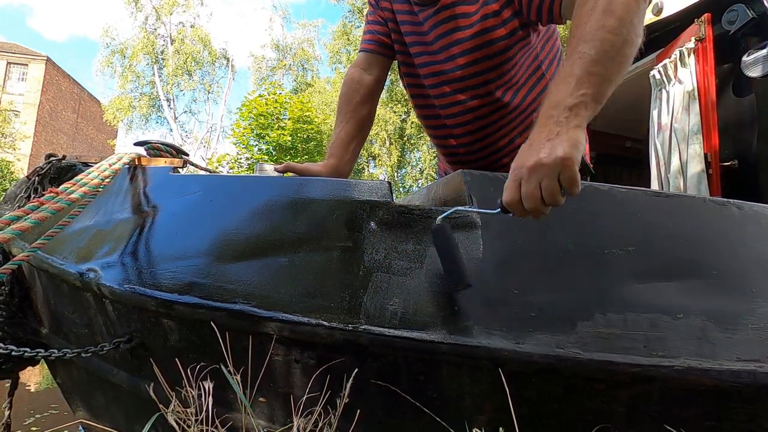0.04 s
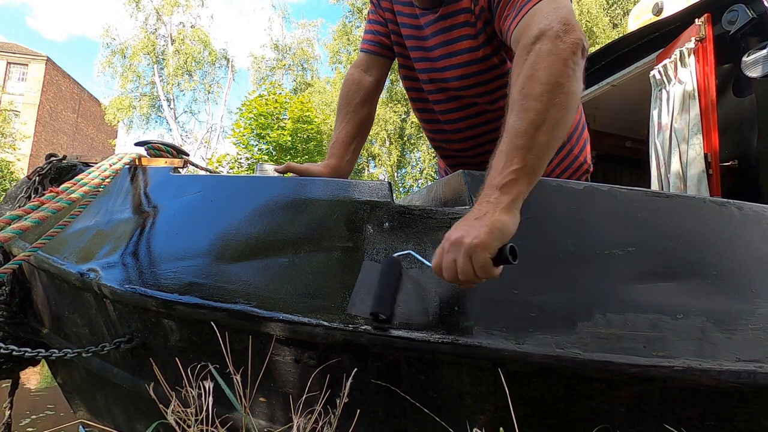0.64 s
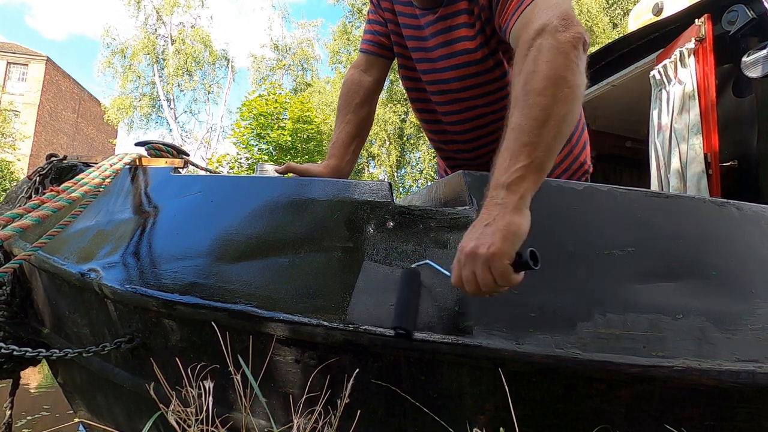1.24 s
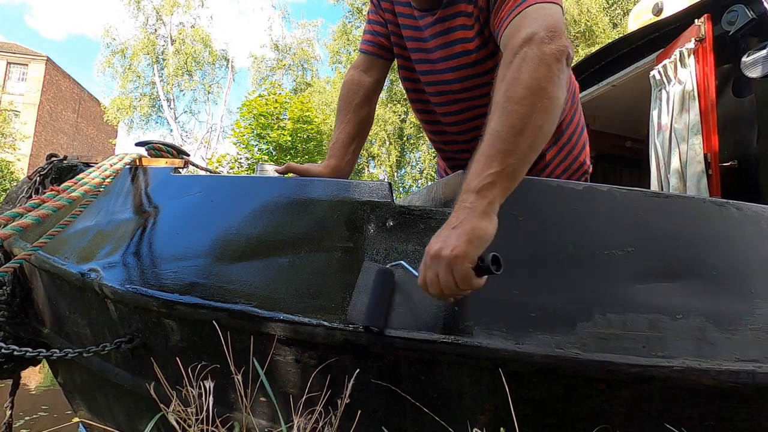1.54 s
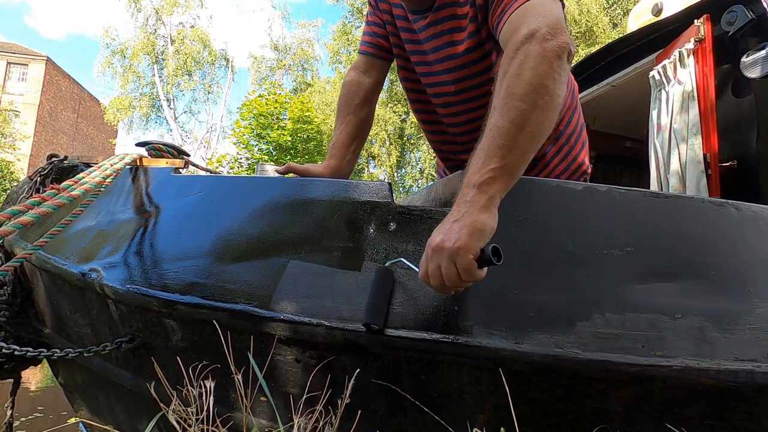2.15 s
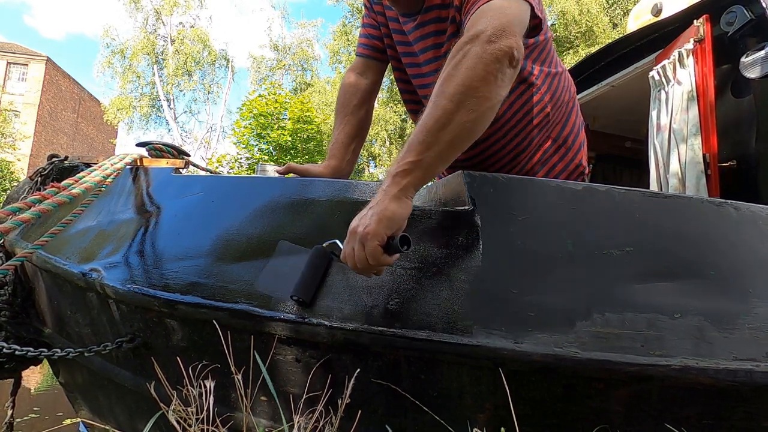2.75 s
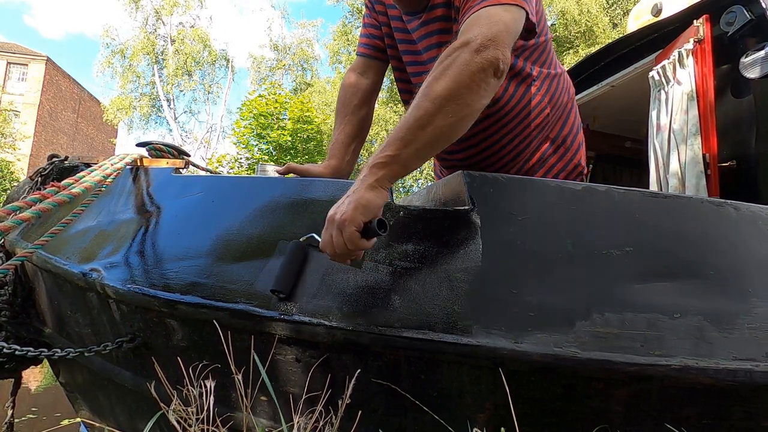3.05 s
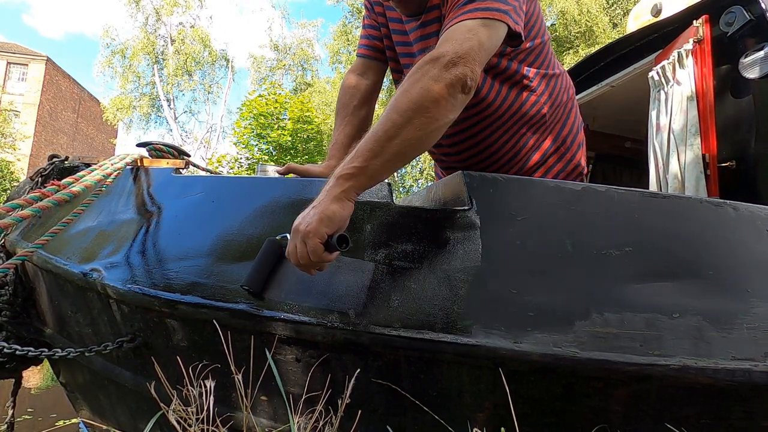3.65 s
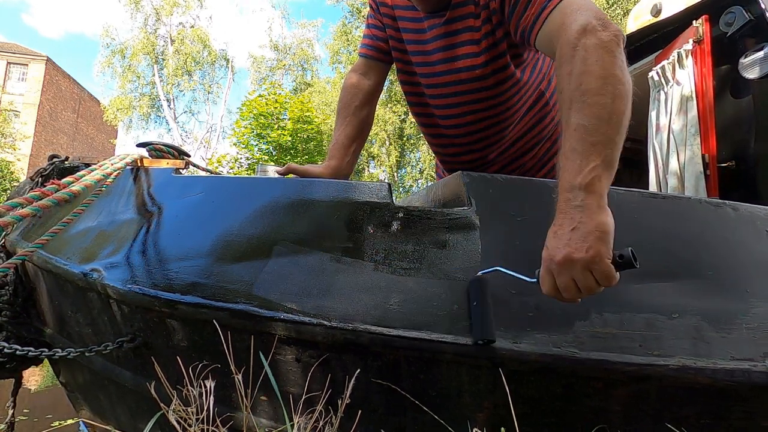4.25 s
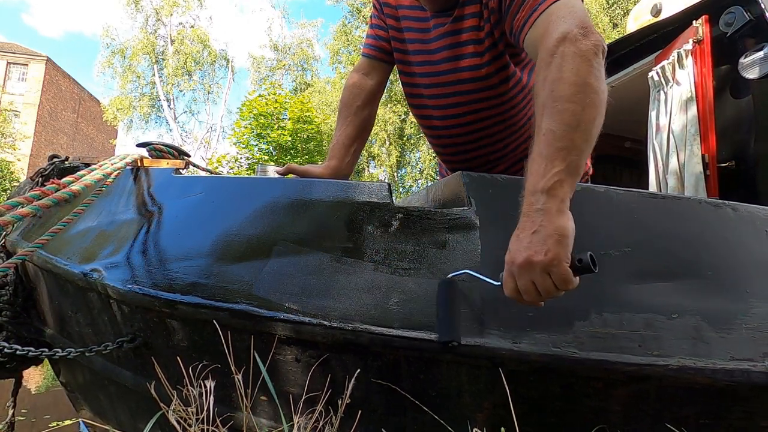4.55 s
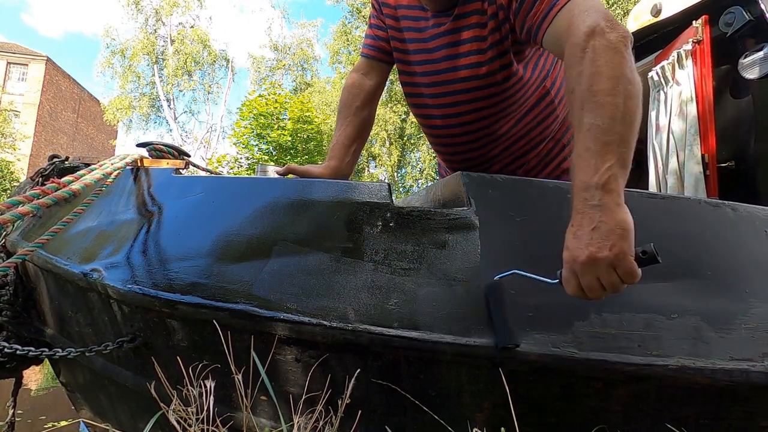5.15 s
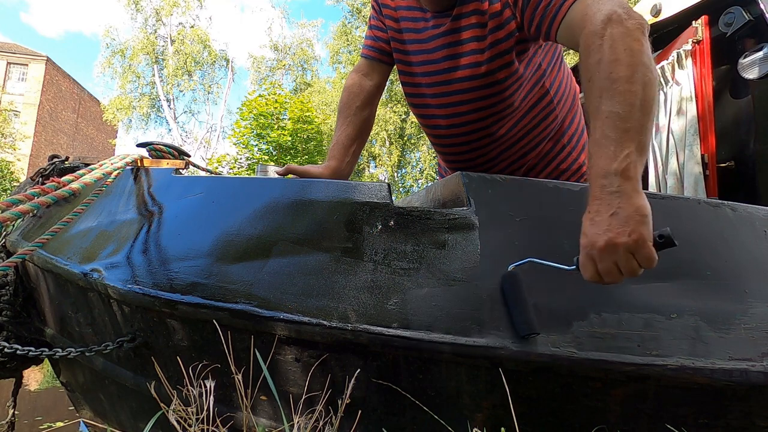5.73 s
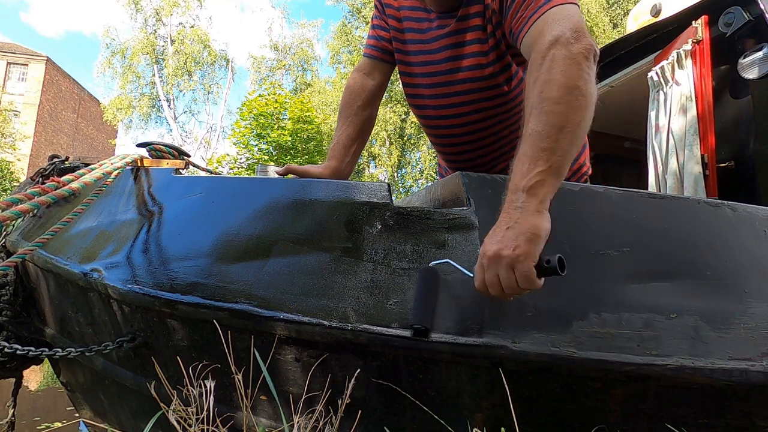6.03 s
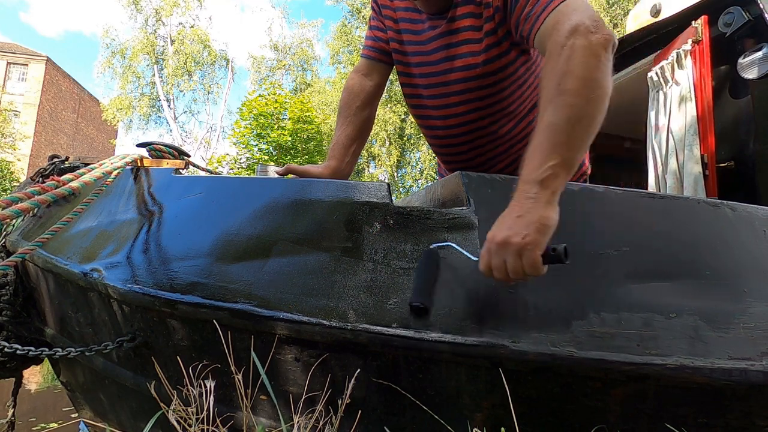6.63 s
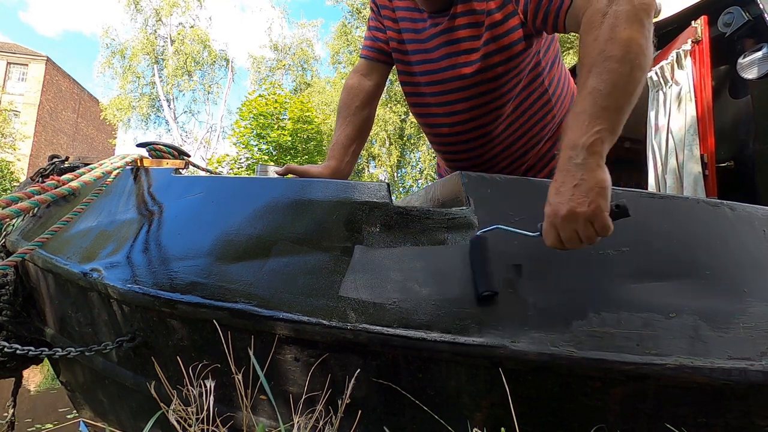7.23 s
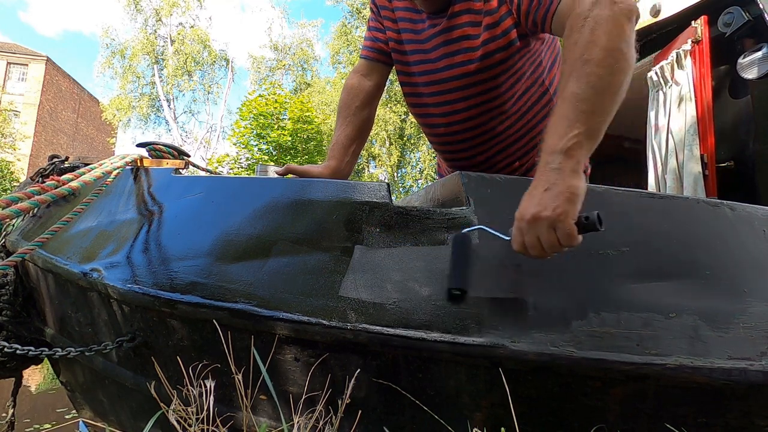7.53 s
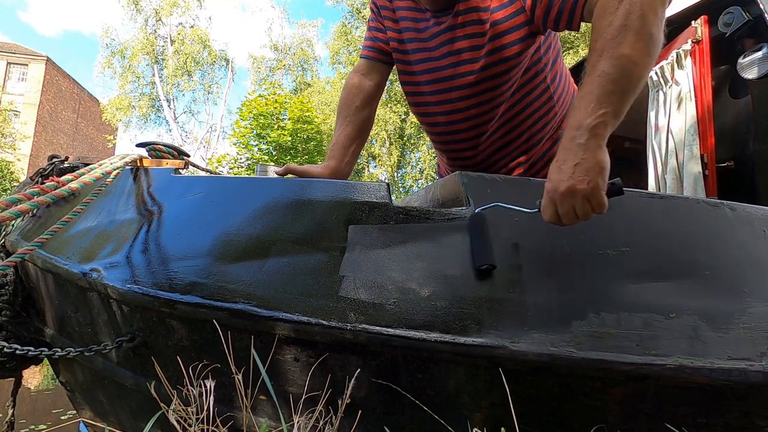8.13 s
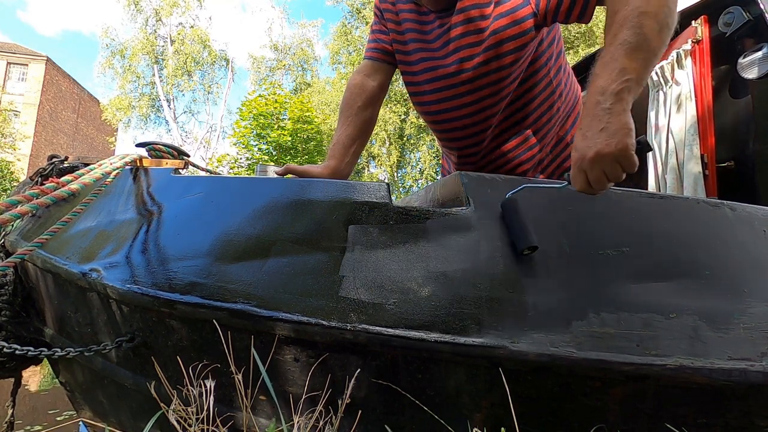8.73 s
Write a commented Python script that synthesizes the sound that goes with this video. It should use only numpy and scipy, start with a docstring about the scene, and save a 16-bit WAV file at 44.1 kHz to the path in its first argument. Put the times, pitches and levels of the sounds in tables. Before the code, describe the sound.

Close by, a small paint roller clicks a few times, then makes soft, tacky rasping strokes to and fro on a steel boat hull, bumping it lightly once past the middle. A much louder, deep diesel drone and exhaust rumble fill the outdoor background throughout. The engine gradually rises in pitch and starts to throb as it draws nearer, while road noise builds behind it.

```python
"""A small paint roller rasps to and fro on a steel boat hull, outdoors, under a heavy diesel's deep drone.
Tacky paint tears off the nap in tiny snaps; the sleeve clicks on its frame and bumps the hull once.
The diesel slowly gathers speed and comes closer; its drone swells and fades as reflections off buildings
cross the direct sound. Behind it: exhaust rumble, a growing rush of road noise, faint squeals."""
import sys
import numpy as np
from scipy import signal
from scipy.fft import rfft, irfft, next_fast_len
from scipy.io import wavfile

SR = 44100
rng = np.random.default_rng(int(sys.argv[2]) if len(sys.argv) > 2 else 0)


def master(y):
    """Save y as 16-bit WAV."""
    cut = np.clip(np.atleast_2d(y).T, -1, 1)
    pcm = np.round(cut * 32767)  # scale
    wavfile.write(sys.argv[1], SR, pcm.astype(np.int16))


N = 391608
TIME = np.arange(N) / SR

# roller sweeps: start_s, length_s, level_db, fastest_fraction, roundness (low: even push, high: one swell)
ROLLER_STROKES = [(0.432, 0.086, -58.5, 0.51, 2.0), (0.49, 0.2, -57.5, 0.61, 1.5),
                  (0.696, 0.26, -58.0, 0.25, 0.64), (0.966, 0.249, -58.0, 0.72, 0.4),
                  (1.243, 0.26, -58.5, 0.18, 0.5), (1.503, 0.472, -55.0, 0.74, 0.5),
                  (1.991, 0.39, -59.0, 0.38, 1.3), (2.352, 0.343, -51.5, 0.37, 0.9),
                  (2.699, 0.23, -59.5, 0.44, 0.6), (2.922, 0.22, -52.0, 0.41, 1.7),
                  (3.118, 0.32, -58, 0.39, 1.4), (3.438, 0.37, -57.0, 0.26, 0.7),
                  (3.788, 0.56, -57.0, 0.6, 1.0), (4.371, 0.24, -64.0, 0.63, 0.5),
                  (4.609, 0.22, -59.5, 0.29, 1.4), (4.785, 0.26, -58.0, 0.67, 1.4),
                  (5.016, 0.33, -58.5, 0.22, 1.7), (5.295, 0.3, -63, 0.73, 1.0),
                  (5.591, 0.353, -60.0, 0.23, 1.5), (5.91, 0.355, -63.0, 0.64, 1.1),
                  (6.252, 0.34, -61.5, 0.25, 1.2), (6.698, 0.3, -58.5, 0.65, 0.5),
                  (6.995, 0.47, -57, 0.55, 1.1), (7.595, 0.33, -55.0, 0.76, 1.4),
                  (7.915, 0.42, -55.0, 0.57, 1.0), (8.315, 0.24, -64.5, 0.85, 0.4),
                  (8.566, 0.23, -56, 0.8, 1.0)]
# tacky patches, where paint tears harder: time_s, extra_db
TACKY_PATCHES = [(.6, 4), (.79, 3), (1.155, 2.5), (1.715, 4), (1.843, 3), (2.16, 4), (2.525, 2),
                 (4.11, 2.5), (4.225, 3.5), (4.685, 2), (5.13, 4), (5.51, 5), (5.72, 2.5), (6.905, 3),
                 (7.275, 4), (7.355, 2), (7.835, 3), (8.185, 1.5)]
# tearing paint: freq_hz, density_db
RASP_SPECTRUM = [(500, -16.5), (1000, -0.5), (2000, -6), (3000, -0.5), (4200, -2.5), (6000, -0.5),
                 (7500, -6.5), (9300, -2.5), (11000, -14.5), (13000, -17), (15500, -23)]
# rasp stereo width: freq_hz, correlation
RASP_CORRELATION = [(500, .9), (2000, .78), (4000, 0.55), (7000, .6), (9000, .66), (12000, .48),
                    (15000, .35)]
# rasp side: freq_hz, left_minus_right_db
RASP_PAN = [(500, -5), (2500, 1), (5000, 0), (9000, -2), (14000, -4.5)]
# reflection peaks and dips in the rasp: freq_hz, width_hz, gain_db
RASP_REFLECTIONS = [(2760, 1200, 1.5), (3260, 200, -4.5), (3780, 620, 4), (6140, 420, 0.5), (7100, 900, -4),
                    (9400, 780, 3), (10950, 1100, -3.5)]
# sleeve knocks on the frame: time_s, level_db, brightness_hz
FRAME_KNOCKS = [(0.0122, -29.5, 9000), (.0252, -42, 2500), (0.1835, -25, 6000), (0.1898, -30, 1500),
                (0.1955, -40, 9000), (0.262, -37.5, 9000), (2.715, -37, 2010), (7.477, -27.5, 1289)]
# frame and handle modes: freq_hz, level_db, t60_s
FRAME_MODES = [(983, -9, 0.028), (1270, -9, 0.019), (1480, -7, .014), (1940, -1.5, 0.01), (2180, -7, 0.013),
               (2470, -2.5, 0.011), (3628, -6.5, 0.013), (4470, -13.5, 0.011), (5400, -15.5, .006)]
# soft bumps on the hull: time_s, level_db
HULL_KNOCKS = [(6.017, -37.5)]
# steel plate modes: freq_hz, level_db, t60_s
HULL_MODES = [(755, 1, .06), (850, -7, .04), (970, -5, .05)]

# diesel speed: time_s, firing_hz
FIRING_RATE = [(0, 51.7), (1.0, 53.4), (2.0, 56.6), (2.7, 59.3), (3.6, 60.7), (4.5, 62), (5.1, 62.8),
               (5.8, 63.1), (6.3, 65), (6.7, 65.6), (7.1, 65), (7.55, 63.3), (7.95, 64.6), (8.25, 64.3),
               (8.6, 64.3), (8.88, 63)]
# engine orders 1-4, multiples of the firing rate: time_s, level_db
ORDER_1_LEVEL = [(0.02, -22), (0.51, -17), (1.99, -21), (2.06, -27), (2.13, -43), (2.18, -24.5),
                 (2.33, -18), (2.7, -21), (3.19, -16), (4.15, -22), (4.5, -34), (4.54, -25.5), (4.99, -16),
                 (6.0, -16), (7.15, -21), (7.4, -28), (7.52, -22), (8.21, -19), (8.36, -27), (8.85, -21)]
ORDER_2_LEVEL = [(0.02, -37), (0.24, -28.5), (1.15, -42), (1.35, -32), (2.28, -27), (2.87, -38),
                 (3.61, -28), (3.73, -37.5), (3.98, -25), (4.27, -32.5), (4.42, -24.5), (4.99, -39),
                 (5.23, -27.5), (5.97, -32), (6.07, -40), (6.73, -30), (8.7, -39), (8.85, -31)]
ORDER_3_LEVEL = [(0, -46.5), (2.9, -49), (3.8, -41.5), (4.3, -47), (5.2, -38), (5.9, -51), (7.0, -38.5),
                 (7.9, -48), (8.6, -38)]
ORDER_4_LEVEL = [(0, -70), (2.4, -55.5), (3.9, -46.5), (4.6, -38.5), (5.2, -36.3), (5.6, -40.5),
                 (6.6, -40.5), (7.7, -47), (8.0, -40), (8.88, -41.5)]
# weak lines from unequal cylinders: order, level_re_rumble_db
UNEVEN_ORDERS = [(.5, -7), (1.5, -20), (2.5, -9.5), (3.5, -16.5), (5, -22.5)]

# exhaust rumble, deep buffeting, road rush, tyre roar: time_s, level_db
RUMBLE_LEVEL = [(0, -38.5), (0.7, -38.3), (1.1, -41.5), (2.2, -37.5), (3.5, -41), (4.4, -38), (4.85, -33.5),
                (5.6, -42), (6.4, -36.8), (7.1, -38.5), (8.65, -33.5)]
BUFFET_LEVEL = [(0, -34), (0.7, -37.5), (1.2, -47), (2.7, -35), (3.5, -43), (4.4, -37), (5.6, -46),
                (6.4, -43), (7.1, -32), (8.0, -32), (8.88, -37)]
RUSH_LEVEL = [(0, -51), (0.8, -54), (1.7, -53), (2.6, -51), (3.5, -52.5), (4.4, -49.5), (4.85, -46.5),
              (5.5, -49), (6.4, -47), (7.45, -45), (7.9, -46.3), (8.88, -44)]
TYRE_LEVEL = [(0, -78.5), (3.8, -69), (4.6, -57.5), (6, -55.5), (7.5, -53), (8.1, -56.5), (8.88, -64)]
# their spectra: freq_hz, density_db
RUMBLE_SPECTRUM = [(45, -5.5), (80, 2.5), (115, 0), (160, 0.5), (220, -4.5), (300, -11), (400, -18.5),
                   (550, -32), (800, -42)]
BUFFET_SPECTRUM = [(15, -7.5), (25, -10), (38, -0.5), (55, -5.5), (80, -7)]
RUSH_SPECTRUM = [(200, 5), (350, 4.5), (520, 5), (720, 0), (1000, -1), (1350, -3.5), (1750, -3), (2400, -7),
                 (3400, -9.5), (4800, -16), (6800, -25.5), (9500, -50.5), (15000, -50)]
TYRE_SPECTRUM = [(550, -12), (700, -4), (850, -0.5), (1000, -7), (1200, -14.5)]
# road noise stereo width: freq_hz, correlation (capped at 1)
ROAD_CORRELATION = [(60, 1.5), (280, 1.1), (500, 0.93), (1000, 0.72), (2000, 0.44), (4000, 0.28), (8000, 0)]
# road noise side: freq_hz, left_minus_right_db
ROAD_PAN = [(60, 1.2), (250, 2), (600, 2.5), (2000, 4.3), (8000, 1.4)]
# reflection peaks and dips in rumble and rush: freq_hz, width_hz, gain_db
ROAD_REFLECTIONS = [(410, 60, 0.5), (505, 33, 3), (649, 50, -5), (672, 51, 4), (824, 82, -5),
                    (1540, 100, 1.5), (1780, 130, 1.5), (2200, 600, -1.8), (3290, 260, 4.5)]
# distant squeals: start_s, end_s, pitch_hz, level_db
SQUEAL_TONES = [(.3, 0.552, 3040, -66.5), (.73, 0.921, 4560, -63), (.97, 1.1, 3820, -63),
                (1.304, 1.604, 3030, -66), (1.824, 2.124, 3025, -63), (3.601, 4.2, 708, -74),
                (3.68, 4.202, 759, -59.5)]


def roller(snaps_per_s=11000, size_spread_db=5.0, nap_db=1.38, nap_hz=50, hiss=0.38, rasp_db=4.5,
           turns_per_s=9.0, lopsided_db=1, patch_sigma_s=0.013):
    """Paint threads snap as the nap lifts off the steel; an unevenly loaded sleeve pulses once a turn."""
    speed, gain = sweeps()
    tearing = np.sqrt(gain / gain.max()) + 0.00077  # faster rolling tears more threads
    snapped = rng.random((2, 2, N)) < snaps_per_s * tearing / SR
    sizes = from_db(size_spread_db * np.minimum(rng.exponential(1, snapped.shape), 4))
    signs = rng.choice([-1, 1], snapped.shape)
    snaps = unit_rms(snapped * sizes * signs / np.sqrt(tearing)) + hiss * white()
    turn_db = lopsided_db * np.sin(2 * np.pi * turns_per_s * np.cumsum(speed) / SR)
    tacky_db = sum(db * np.exp(-.5 * ((TIME - time_s) / patch_sigma_s) ** 2) for time_s, db in TACKY_PATCHES)
    level_db = rasp_db + turn_db + tacky_db + nap_db * drift(nap_hz)
    return gain * from_db(level_db) * coloured(snaps, RASP_SPECTRUM, RASP_CORRELATION, RASP_PAN)


def sweeps():
    """Each stroke speeds up from rest and slows to the turn. Returns speed (0-1) and rasp gain."""
    speed, gain = np.zeros(N), np.zeros(N)
    for start_s, length_s, level_db, fastest, roundness in ROLLER_STROKES:
        travel = np.interp(TIME, start_s + length_s * np.array([0, fastest, 1]), [0, .5, 1])
        arch = np.sin(np.pi * np.minimum(travel, 1 - travel))
        speed = np.maximum(speed, arch)
        gain = np.hypot(gain, from_db(level_db) * arch ** roundness)
    return speed, gain


def frame_clicks(vary_db=2.0):
    """The sleeve knocks on its wire frame; a soft knock stirs only the low modes."""
    times_s, level_db, bright_hz = np.transpose(FRAME_KNOCKS)
    scatter_db = vary_db * rng.standard_normal((len(FRAME_KNOCKS), len(FRAME_MODES)))
    strengths = from_db(level_db[:, None] + scatter_db)
    out = 0
    for k, (hz, mode_db, t60_s) in enumerate(FRAME_MODES):
        knocks = np.zeros(N)
        knocks[np.round(times_s * SR).astype(int)] = strengths[:, k] / np.hypot(1, (hz / bright_hz) ** 3)
        out += (-1) ** k * from_db(mode_db) * ring(knocks, hz, t60_s)
    return out * pan(left_db=-2.0)


def hull_bump():
    """A soft bump rings the steel plate briefly."""
    knocks = np.zeros(N)
    for time_s, level_db in HULL_KNOCKS:
        knocks[round(time_s * SR)] = from_db(level_db)
    plate = sum(from_db(mode_db) * ring(knocks, hz, t60_s) for hz, mode_db, t60_s in HULL_MODES)
    return plate * pan(left_db=1.0)


def diesel_drone(rumble_db, flutter_db=0.56, jitter_rad=0.0083):
    """Orders 1-3 and weak uneven lines; firings vary in strength and timing, shaking high orders most."""
    phase = 2 * np.pi * np.cumsum(curve(FIRING_RATE)) / SR + jitter_rad * drift(12)
    orders_db = curve(ORDER_1_LEVEL), curve(ORDER_2_LEVEL) - 0.5, curve(ORDER_3_LEVEL)
    out = 0
    for order, level_db in enumerate(orders_db, 1):
        gain = from_db(level_db + order * flutter_db * drift(25))
        out += gain * np.sin(order * phase + rng.uniform(0, 2 * np.pi))
    for order, level_db in UNEVEN_ORDERS:
        gain = from_db(rumble_db + level_db + 3 * drift(2))
        out += gain * np.sin(order * phase + drift(1.5))
    return np.sqrt(2) * out * pan(left_db=1.4)


def diesel_hum(throb_hz=7.8, throb_depth=0.7, throb_start_s=4.16, throb_rise_s=3.2, crest_s=8.37,
               flutter_db=1.5, waver_rad=0.52):
    """Upper hum at order 4; it begins to throb as the engine comes near."""
    depth = throb_depth * np.clip((TIME - throb_start_s) / throb_rise_s, 0, 1)
    throb = 1 + depth * np.cos(2 * np.pi * throb_hz * (TIME - crest_s))
    phase = 2 * np.pi * np.cumsum(4 * curve(FIRING_RATE)) / SR
    tone = np.sqrt(2) * np.sin(phase + waver_rad * drift(8))
    gain = from_db(curve(ORDER_4_LEVEL) + flutter_db * drift(13))
    return gain * throb * tone * pan(left_db=1.5)


def traffic(rumble_db, rush_trim_db=0.45, flicker_db=0.96):
    """Deep buffeting, turbulent exhaust, smooth road rush and the roar of tread."""
    def noise(spectrum):
        return coloured(white(), spectrum, ROAD_CORRELATION, ROAD_PAN)

    buffet = from_db(curve(BUFFET_LEVEL)) * noise(BUFFET_SPECTRUM)
    rumble = from_db(rumble_db) * noise(RUMBLE_SPECTRUM)
    rush = from_db(curve(RUSH_LEVEL) + rush_trim_db + flicker_db * drift(8)) * noise(RUSH_SPECTRUM)
    tyres = from_db(curve(TYRE_LEVEL)) * noise(TYRE_SPECTRUM)
    return buffet + reflections(rumble + rush, ROAD_REFLECTIONS) + tyres


def squeals(waver_fraction=0.0012):
    """Thin distant tones swell and die away."""
    out = 0
    for start_s, end_s, pitch_hz, level_db in SQUEAL_TONES:
        swell = np.sin(np.pi * np.clip((TIME - start_s) / (end_s - start_s), 0, 1))
        wavering_hz = pitch_hz * (1 + waver_fraction * drift(17))
        out += from_db(level_db) * swell * np.sin(2 * np.pi * np.cumsum(wavering_hz) / SR)
    return np.sqrt(2) * out * pan(left_db=1.0)


def reflections(x, peaks):
    """Peaks and dips left by reflections, as a chain of peaking filters."""
    for hz, width_hz, gain_db in peaks:
        w, gain = 2 * np.pi * hz / SR, from_db(gain_db / 2)
        damping = np.pi * width_hz / SR
        x = signal.lfilter([1 + damping * gain, -2 * np.cos(w), 1 - damping * gain],
                           [1 + damping / gain, -2 * np.cos(w), 1 - damping / gain], x)
    return x


def arriving(pair, right_lead_ms):
    """Sound from the right reaches the right channel first."""
    size = next_fast_len(N + 64)
    freq_khz = np.fft.rfftfreq(size, 1000 / SR)
    shift = np.exp(1j * np.pi * freq_khz * right_lead_ms * np.array([[-1], [1]]))
    return irfft(rfft(pair, size) * shift, size)[:, :N]


def coloured(pairs, spectrum, correlation, balance):
    """Third-octave bands from alternating mid-side pairs, each with its level, width and pan. Mid rms 1."""
    out, edges_hz = 0, 14 * 2 ** (np.arange(32) / 3)
    for k, (low_hz, high_hz) in enumerate(zip(edges_hz, edges_hz[1:])):
        if high_hz < spectrum[0][0] or low_hz > spectrum[-1][0]:
            continue
        bandpass = signal.butter(2, [low_hz, high_hz], "band", fs=SR, output="sos")
        mid, side = signal.sosfilt(bandpass, pairs[k % 2])
        hz = np.sqrt(low_hz * high_hz)
        alike = np.clip(at_hz(correlation, hz), -.9, 1)
        band = mid + np.sqrt((1 - alike) / (1 + alike)) * side * [[1], [-1]]
        out += from_db(at_hz(spectrum, hz)) * pan(at_hz(balance, hz)) * band
    return out / np.std(out.mean(axis=0))


def ring(knocks, hz, t60_s):
    """One mode: a unit knock starts a decaying sine of height 1."""
    r, w = from_db(-60 / (t60_s * SR)), 2 * np.pi * hz / SR
    return signal.lfilter([0, np.sin(w)], [1, -2 * r * np.cos(w), r * r], knocks + 1e-18)


def drift(rate_hz):
    """Smooth random wander, rms 1."""
    hop, settle_steps = 40, 2000
    r = np.exp(-2 * np.pi * rate_hz * hop / SR)
    noise = rng.standard_normal(N // hop + settle_steps + 2)
    slow = signal.lfilter([1], [1, -2 * r, r * r], noise)[settle_steps:]
    return np.interp(np.arange(N) / hop, np.arange(len(slow)), unit_rms(slow))


def white():
    """Two independent mid-side noise pairs."""
    return rng.standard_normal((2, 2, N))


def curve(points):
    """A time table at every sample."""
    return np.interp(TIME, *np.transpose(points))


def at_hz(points, hz):
    """Interpolate on a log-frequency axis."""
    freq_hz, values = np.transpose(points)
    return np.interp(np.log(hz), np.log(freq_hz), values)


def pan(left_db):
    """Stereo gains for a left-minus-right level."""
    return from_db(np.array([[.5], [-.5]]) * left_db)


def from_db(db):
    return 10 ** (np.asarray(db) / 20)


def unit_rms(x):
    return x / np.sqrt(np.mean(x ** 2) + 1e-20)


def scene():
    """Roller close by, slightly right; diesel and road behind."""
    rumble_db = curve(RUMBLE_LEVEL)
    road = diesel_drone(rumble_db) + diesel_hum() + traffic(rumble_db) + squeals()
    painting = reflections(roller(), RASP_REFLECTIONS) + frame_clicks() + hull_bump()
    return arriving(painting, right_lead_ms=0.026) + arriving(road, right_lead_ms=0.053)


def record(dry):
    """Short fade at both ends, steep low-pass."""
    fade_s, cutoff_hz = 0.004, 15700
    edge_s = np.minimum(TIME, TIME[-1] - TIME)
    fade = np.sin(np.pi / 2 * np.clip(edge_s / fade_s, 0, 1)) ** 2
    return signal.sosfilt(signal.ellip(10, .1, 90, cutoff_hz, fs=SR, output="sos"), dry * fade)


dry = scene()
out = record(dry)
master(out)
```